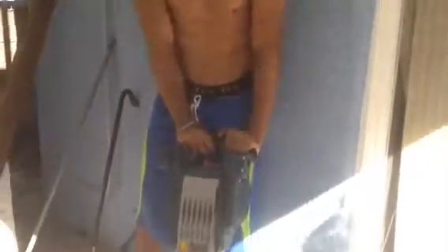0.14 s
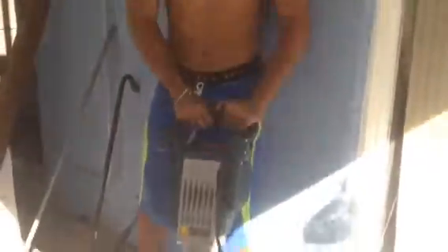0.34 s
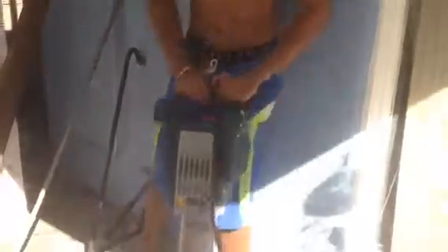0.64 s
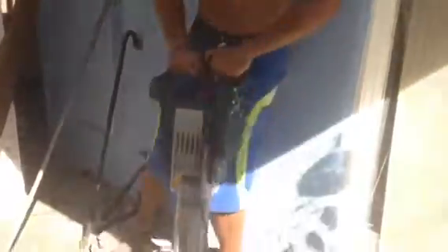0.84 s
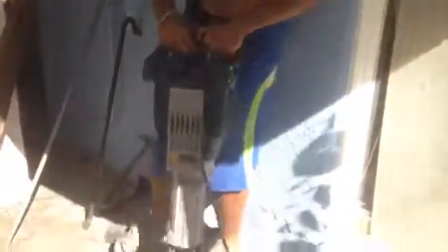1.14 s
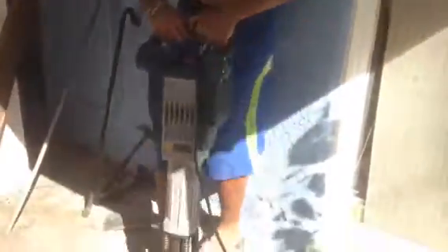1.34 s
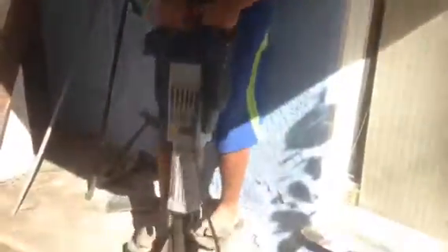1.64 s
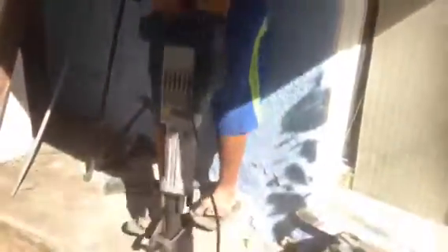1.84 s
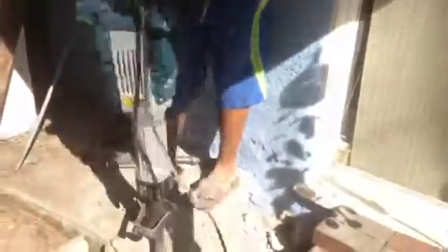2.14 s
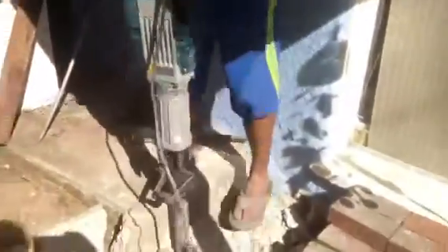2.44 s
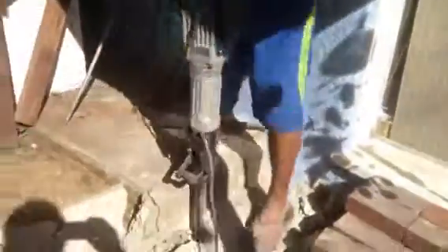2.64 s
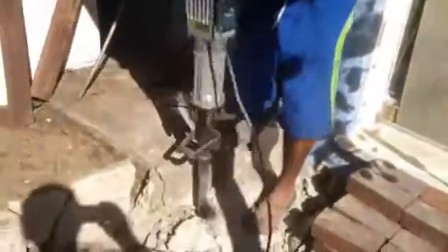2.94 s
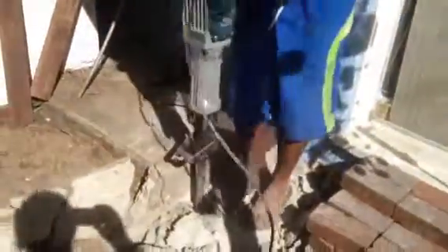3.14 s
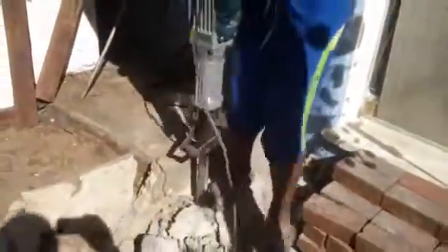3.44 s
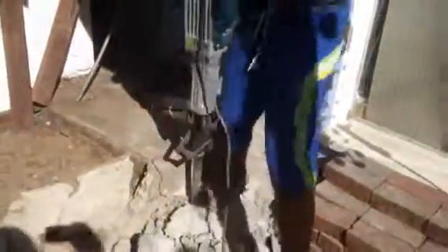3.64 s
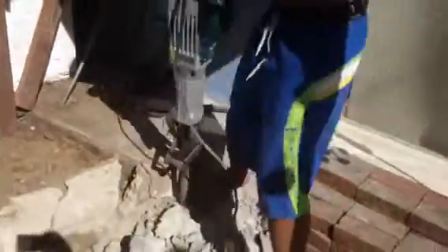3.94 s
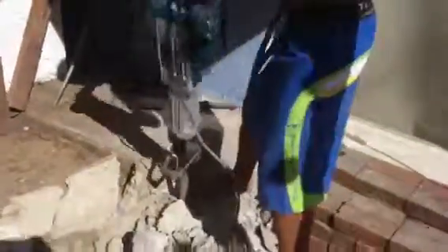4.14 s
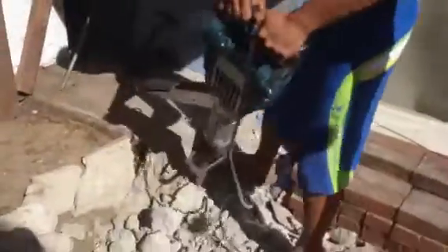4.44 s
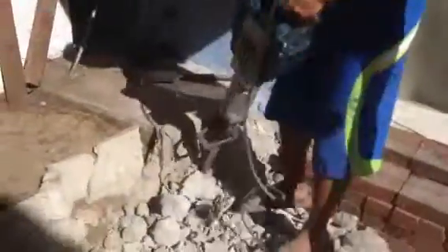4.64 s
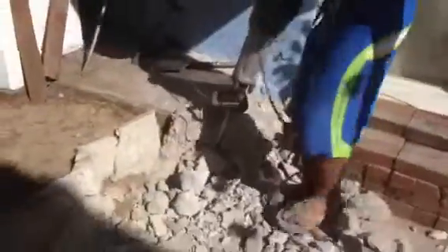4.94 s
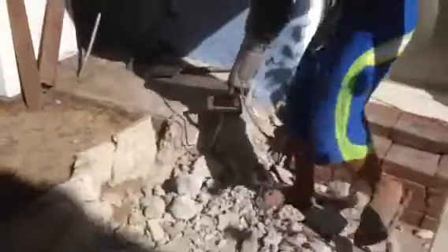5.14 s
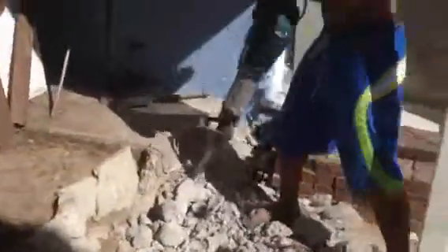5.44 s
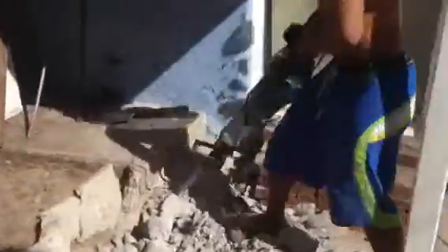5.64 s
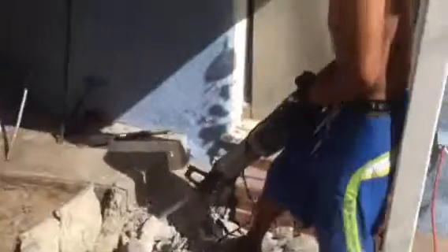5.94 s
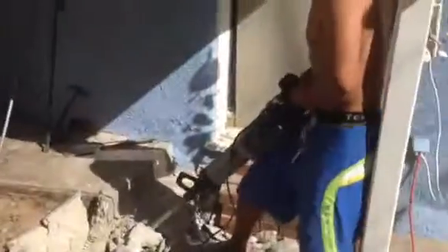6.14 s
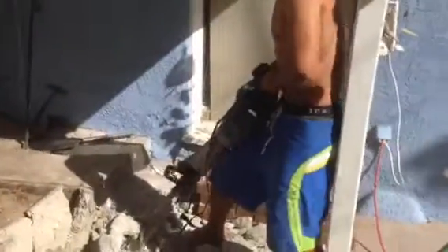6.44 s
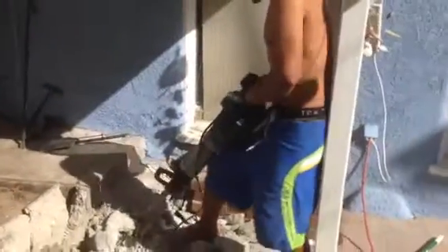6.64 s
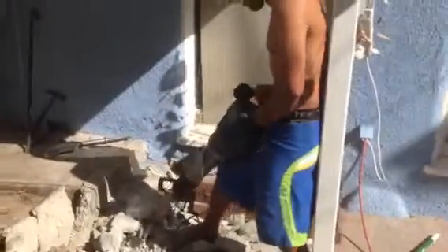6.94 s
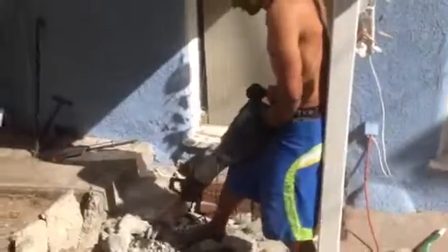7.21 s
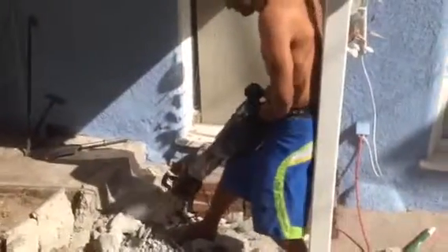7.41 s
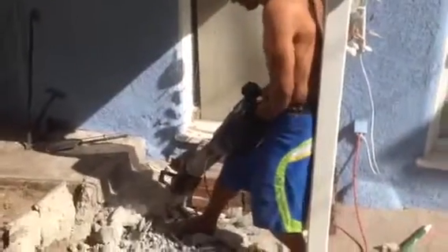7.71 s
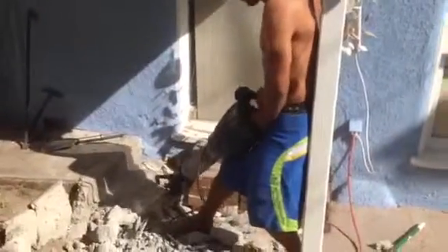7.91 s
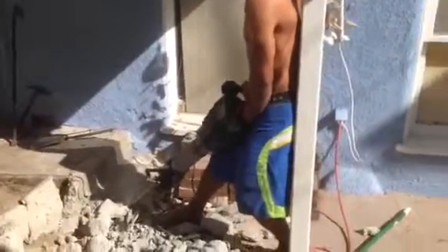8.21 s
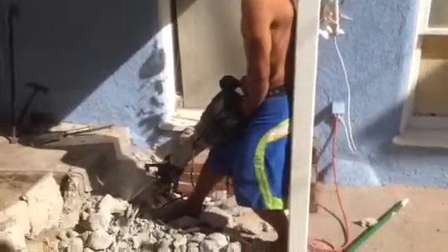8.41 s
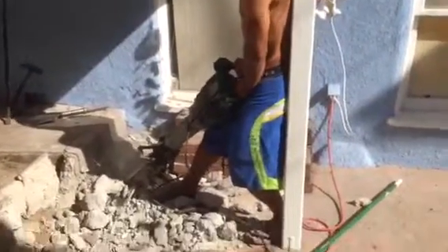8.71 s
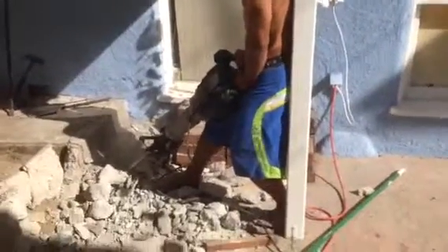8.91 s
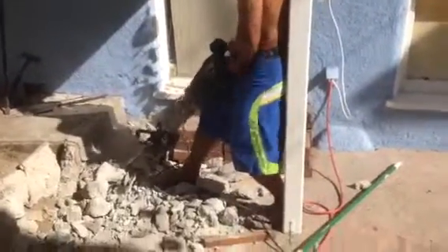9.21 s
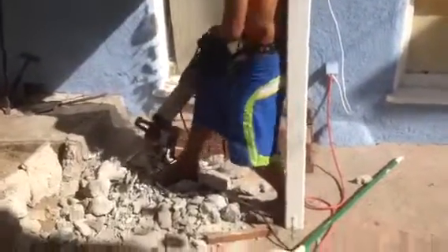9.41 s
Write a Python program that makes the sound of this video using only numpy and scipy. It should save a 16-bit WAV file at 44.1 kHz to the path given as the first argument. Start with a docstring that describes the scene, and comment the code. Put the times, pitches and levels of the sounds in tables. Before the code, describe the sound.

Outdoors beside a house, an electric jackhammer is already working. From 0 to about 1 second it strikes in quick bursts, roughly 25 blows a second: hard gritty cracks, low slab thuds, rubble rattle. It then lifts, the motor racing up into a rushing, fluttering high whine, with two or three isolated knocks near 1.8 to 1.9 seconds. Short bursts return from 2.2 to 3.6 seconds with small gaps; around 2.5 there is a tiny downward squeal and a hollow knock of loosened concrete. From 3.6 to 6.7 the motor runs free, its whine swelling and receding over faint metallic clinking. At 6.7 a deep knock and renewed bursts begin, and from 7.6 to nearly 9.6 hammering is continuous, brighter, with ringing steel and longer rattle, the motor whine dragged lower. A short dull echo and faint low rumble surround everything.

```python
"""A fast run of hard cracks: an electric jackhammer breaks a concrete slab beside a house wall.
Each blow is a short noise crack, a thud of low slab tones and a ring of the steel chisel's tones.
Loose parts and rubble rattle on behind it as fading noise.
Between bursts the tool is lifted: the motor races up, its fan rushing (noise) and whining (tones).
The wall and ground answer with a short dull echo, over a faint low outdoor rumble."""
import sys
import numpy as np
from scipy import signal
from scipy.fft import rfft, irfft, next_fast_len
from scipy.io import wavfile
from scipy.ndimage import uniform_filter1d, map_coordinates

SR = 44100
rng = np.random.default_rng(int(sys.argv[2]) if len(sys.argv) > 2 else 0)


def generate_wav(sig):
    """Save sig (samples, or channels by samples) to the path in sys.argv[1] as 16-bit PCM at SR."""
    pcm = np.round(np.clip(np.atleast_2d(sig).T, -1, 1) * 32767).astype(np.int16)
    wavfile.write(sys.argv[1], SR, pcm)


N = 422037  # length in samples

# Bursts of hammering, before the small scatter from blow to blow: first_blow_s, last_blow_s,
# blow_count, first_gap_s, first_crack_db, later_crack_db, first_ring_db, last_ring_db,
# drag_hz (whine pitch lost per blow)
HAMMER_BURSTS = [(.018, 0.394, 9, .0462, -12.5, -10.5, -27.5, -35.5, 185),
                 (.491, 0.628, 4, .039, -12.5, -13, -32, -37, 125),
                 (.755, .839, 3, 0.038, -11, -12, -37, -39, 126),
                 (2.242, 2.316, 3, .036, -14, -11, -37, -44, 96),
                 (2.415, 2.585, 6, 0.034, -14, -15, -24, -25, 96),
                 (2.868, 3.014, 5, .0397, -17, -11.5, -55, -21, 96),
                 (3.364, 3.507, 5, 0.038, -17.5, -12.5, -30, -37, 106),
                 (6.817, 6.975, 6, .0343, -17, -14, -28, -21, 150),
                 (7.121, 7.305, 6, .0397, -20.5, -13.5, -33, -22.5, 190),
                 (7.424, 7.462, 2, .037, -13, -14.5, -21, -22, 190),
                 (7.628, 9.558, 42, 0.038, -11.5, -14.3, -23, -23, 188)]
# Single blows, listed one by one, some loud and some faint, before scatter: start_s, crack_db, ring_db
SINGLE_BLOWS = [(.928, -12, -43), (.969, -14.5, -38), (1.81, -13, -40), (1.847, -12, -42),
                (1.943, -23, -50), (2.768, -10.5, -25), (3.265, -15, -38), (3.574, -11, -24),
                (6.723, -16.5, -24.5), (7.389, -18.5, -43), (7.549, -17.5, -27)]
# How hard the tool bears on the slab, which sets thud and rattle: time_s, level_db
BEARING_DOWN = [(.9, -7), (1.85, -20), (2.55, -2), (3.4, -3.5), (7.6, -7), (8.4, -2.5), (9.5, -7)]
# Colour of the noise of crushed concrete: pitch_hz, level_db (per Hz, only the shape counts)
STONE_COLOUR = [(100, -23), (350, 1.5), (900, -3), (2300, 0.5), (3800, 0), (5600, 2), (8300, -6.5),
                (11000, -2), (15500, -6)]
# Tones of the steel chisel, before small random changes: pitch_hz, level_db, t60_s (time to fall 60 dB)
CHISEL_TONES = [(3165, -13, 0.2), (4850, -4, 0.26), (4998, -4, 0.2), (5518, 3, 0.22), (7010, -9, 0.28),
                (7130, -6, 0.24), (9370, -7, 0.21), (9550, -10.5, 0.21), (10798, 0, 0.25),
                (11920, -12.5, 0.35), (14520, -9.5, .17), (14665, -8.5, 0.17)]
# How the chisel is seated: time_s, trade_db (the tone near 5.5 kHz gains this, lower ones lose half of it),
# freedom_db (extra ring level)
CHISEL_SEAT = [(.6, -6, 0), (2.5, -3, 0), (3.4, 1, 0.5), (6.9, 2.5, 0), (7.7, -4, 0.5), (7.93, -9, 1),
               (8.35, -2, -2), (8.85, 2, -7), (8.99, 5, 2), (9.24, 4, 2), (9.38, 0, -2), (9.55, 5.5, -0.5)]
# Tones of slab and tool housing, before small random changes: pitch_hz, t60_s, upright_db, slanted_db
SLAB_TONES = [(92, 0.06, -12, -14), (131, 0.078, -2, -2.5), (189.3, 0.09, -8, 2), (238, 0.046, -3, 1.5),
              (370, 0.012, 4, -2), (543, 0.054, -12, -3.5), (765, 0.029, -6, -1), (1080, .02, -6, -12)]
# Slab pieces breaking loose: start_s, pitch_hz, level_db, t60_s
LOOSE_PIECES = [(2.549, 551, -19, 0.12), (6.705, 80, -15, 0.29), (6.73, 136, -16, 0.21)]
# Level of the hammering's top treble: time_s, level_db
TREBLE_LEVEL = [(1, -.5), (2.1, -3), (3.6, -5), (6.9, -1.5), (7.7, 2), (8.8, 0)]
# Colour of the fan air and gear noise: pitch_hz, level_db (per Hz, only the shape counts)
AIR_COLOUR = [(130, -55), (210, -24.5), (400, -10.5), (930, -6), (2120, 0), (2880, -2), (4620, -3.5),
              (6900, -9), (9540, -11.5), (15300, -21)]
# Resonances of the motor casing: pitch_hz, width_hz, boost_db
CASING_PEAKS = [(944, 240, 3), (1730, 57, 2), (2080, 90, 4.5)]
# Fan whine: multiple (of the blade pitch), level_db (at full speed, relative to the motor noise)
FAN_TONES = [(1, -16.8), (2, -16.5), (3, -21)]
# Crank shake: multiple (of the crank's turning rate), level_db (at full speed, relative to the motor noise)
CRANK_TONES = [(2, -25.5), (3, -26.5), (4, -27)]
# Fan whine as the vents turn to and from the listener: time_s, level_db
VENT_TURNS = [(1.5, 9), (2.2, 4), (4.1, 12), (4.6, 1), (4.9, 10), (5.3, 1), (5.6, 11), (5.85, 4.5),
              (6.35, 3), (6.6, 10.5)]
# How much motor noise reaches the listener as the tool is moved about: time_s, level_db
MOTOR_NEARNESS = [(.3, 0), (1.05, -2), (1.4, 1.5), (1.75, 2.3), (2, -1.5), (4.5, -.6), (5.9, 1), (6.7, 0),
                  (7.2, -1), (8.2, 3.5)]
# The crank's highest tone, which swells as the idling tool is leant on the slab: time_s, level_db
TOOL_LEAN = [(4.5, -5), (5.1, 1), (6.05, -1), (6.4, 6.5), (7, 3)]

SINGLE_DRAG_HZ = 60  # whine pitch lost to a single blow
SETTLE = .65  # share of the change of pace still to come after each blow
SCATTER_S, CRACK_SCATTER_DB, RING_SCATTER_DB = .0003, .9, 1.5  # typical scatter from blow to blow
BLADES, WHINE_PER_CRANK_TURN = 13, 134.4  # whine cycles per rotor turn and per crank turn
FREE_HZ, SPIN_UP_S = 4656, .47  # whine pitch with no load, time constant of its recovery
START_SAG_HZ = 1820  # the motor is already under load
FAN_DB, FAN_DB_PER_HZ = -18.4, .021  # fan rush at full speed, its loss per Hz of sag
GEAR_DB = -33.3  # gear noise, the same at any speed
TREBLE_HZ, TOP_HZ = 11000, 15350  # where the top treble begins, where all sound ends


def piston():
    """The piston strikes in bursts and single blows: rows of time_s, crack_db, ring_db, drag_hz."""
    rows = [(*blow, SINGLE_DRAG_HZ) for blow in SINGLE_BLOWS]
    for burst in HAMMER_BURSTS:
        first, last, count, first_gap, entry_db, crack_db, first_ring_db, last_ring_db, drag_hz = burst
        times = burst_times(first, last, round(count), first_gap)
        ring_levels = np.linspace(first_ring_db, last_ring_db, len(times))
        for k, ring_db in enumerate(ring_levels):
            rows.append((times[k], crack_db if k else entry_db, ring_db, drag_hz))
    spread = [SCATTER_S, CRACK_SCATTER_DB, RING_SCATTER_DB, 0]
    return np.array(sorted(rows)) + rng.standard_normal((len(rows), 4)) * spread


def burst_times(first, last, count, first_gap):
    """The gap eases from the first one to a steady gap that makes the last blow fall on its listed time."""
    k = np.arange(count)
    early = (1 - SETTLE ** k) / (1 - SETTLE)
    steady_gap = first_gap
    if count > 2:
        steady_gap = (last - first - first_gap * early[-1]) / (k - early)[-1]
    return first + first_gap * early + steady_gap * (k - early)


def slanted(s):
    """The tool starts upright and is later driven in at a slant."""
    return s > 5


def concrete(blows):
    """The tip crushes stone in a short crack; chips and the loose chisel chatter on behind it."""
    t = np.arange(SR // 5) / SR
    crack, rattle = np.zeros(N), np.zeros(N)
    stretches = np.exp(0.14 * rng.standard_normal((len(blows), 2)))  # no two blows last equally long
    for (s, db, _, _), (crack_stretch, rattle_stretch) in zip(blows, stretches):
        skid_t60 = .15 if slanted(s) else .11  # a slanted chisel skids on
        add(crack, s, amp(db + 4.0) * fade(t, t60=0.033 * crack_stretch, attack=0.00055))
        add(rattle, s, amp(db + 2.5) * fade(t, t60=skid_t60 * rattle_stretch, attack=0.0046))
    bite_db, = curves(BEARING_DOWN)
    rattle *= amp(bite_db + 0.69 * wobble(220))
    stone = mottled(colour(grit(spread_db=2.0), STONE_COLOUR), depth_db=3.5, width=5, length=5)
    chips = mottled(colour(grit(spread_db=2.5), STONE_COLOUR), depth_db=2.0, width=2, length=5)
    return crack * stone + rattle * chips


def chisel(blows):
    """Every blow chokes the steel's last ring and starts a new one; rubbing in the hole roughens each tone."""
    t = np.arange(SR // 5) / SR
    hz, mode_db, t60 = np.transpose(CHISEL_TONES)[:, :, None]
    favour = np.select([hz < 5250, hz < 6000], [-.5, 1])
    gaps = np.diff(blows[:, 0], append=N / SR)
    seat_s, trade_db, free_db = np.transpose(CHISEL_SEAT)
    rub = wobble(130)
    out = np.zeros(N)
    for (s, _, db, _), gap in zip(blows, gaps):
        strength, detune, phase = rng.standard_normal((3, len(CHISEL_TONES), 1))
        # each tone takes its own random stretches of the rubbing, for loudness and for phase
        starts = rng.integers(N - len(t), size=(2, len(CHISEL_TONES), 1))
        waver, slip = rub[starts + np.arange(len(t))]
        share = amp(mode_db + favour * np.interp(s, seat_s, trade_db) + 3.7 * strength)
        angle = 2 * np.pi * (hz * (1 + .0008 * detune) * t + phase) + .55 * slip
        tones = np.sin(angle) * amp(3.5 * waver)
        ring = np.sum(share * tones * fade(t, t60, attack=0.0045), axis=0) / np.linalg.norm(share)
        choke = np.exp(-np.maximum(t - gap, 0) / 0.0086)  # from the next blow on
        add(out, s, amp(db + 11 + np.interp(s, seat_s, free_db)) * choke * ring)
    return out


def slab(blows):
    """The blow and two rebounds of the tool thump the slab; its voice changes as the tool is slanted."""
    t = np.arange(SR // 5) / SR
    hz, t60, upright_db, slanted_db = np.transpose(SLAB_TONES)[:, :, None]
    out = np.zeros(N)
    for s, db, _, _ in blows:
        slant = slanted(s)
        tone_db = slanted_db if slant else upright_db
        # delay in s (before scatter), level in dB, signed strength
        contacts = [(0, -6, -0.65), (.0089, -3.5, 0.85), (.0165, -9 if slant else -16, 1)]
        for delay, contact_db, sign in contacts:
            strength, detune = rng.standard_normal((2, len(SLAB_TONES), 1))
            share = amp(tone_db + 2 * strength)
            tones = np.sin(2 * np.pi * hz * (1 + 0.019 * detune) * t)
            thump = np.sum(share * tones * fade(t, t60, attack=0.00037), axis=0)
            late = delay * (1 + 0.063 * rng.standard_normal())
            add(out, s + late, sign * amp(db + contact_db) * thump)
    return out * amp(curves(BEARING_DOWN)[0])


def breaks():
    """Loosened pieces of slab give hollow knocks: single fading tones, slightly roughened."""
    t = np.arange(SR // 2) / SR
    out = np.zeros(N)
    for s, hz, db, t60 in LOOSE_PIECES:
        add(out, s, amp(db) * np.sin(2 * np.pi * hz * t) * fade(t, t60, attack=0.0035))
    return out * amp(2.4 * wobble(150))


def squeal(s, from_hz, to_hz, length, db):
    """The chisel slips down a crack with a short squeal that slides in pitch."""
    u = np.linspace(0, 1, round(length * SR))
    phase = 2 * np.pi * np.cumsum(from_hz + (to_hz - from_hz) * u) / SR
    out = np.zeros(N)
    add(out, s, amp(db) * u * np.sin(np.pi * u) * np.sin(phase))
    return out


def brighten(x):
    """Raise or lower the top treble of x over time."""
    top = filtered(x, lambda hz: 1 - 1 / (1 + (hz / TREBLE_HZ) ** 10))
    return x + (amp(curves(TREBLE_LEVEL)[0]) - 1) * top


def sag(blows):
    """Hz the whine lies under its free pitch: each blow brakes the motor, which then races up again."""
    t = np.arange(N) / SR
    braking = np.zeros(N)
    braking[0] = START_SAG_HZ
    for s, _, _, drag_hz in blows:
        add(braking, s, np.array([drag_hz]))
    recovering = signal.fftconvolve(braking, np.exp(-t / SPIN_UP_S))[:N]
    return uniform_filter1d(recovering, size=1500)


def casing(f):
    """The motor casing resonates: its gain at each frequency f."""
    return amp(sum(db / (1 + (2 * (f - hz) / width) ** 2) for hz, width, db in CASING_PEAKS))


def motor(blows):
    """Fan air and gear noise through the casing, with blade, rotor and crank tones locked together."""
    sag_hz = sag(blows)
    whine_hz = FREE_HZ - sag_hz
    power = (whine_hz / FREE_HZ) ** 2  # a slowed motor sings less
    rush = amp(FAN_DB - FAN_DB_PER_HZ * sag_hz)
    level = np.hypot(rush, amp(GEAR_DB)) * amp(curves(MOTOR_NEARNESS)[0])
    blade = 2 * np.pi * np.cumsum(whine_hz * (1 + .001 * wobble(60))) / SR  # running phase
    crank = blade / WHINE_PER_CRANK_TURN

    air = unit(filtered(colour(grit(spread_db=0.6), AIR_COLOUR), casing))
    air = mottled(air, depth_db=2.5, width=2, length=10)
    air *= amp(0.4 * np.sin(crank) + 0.54 * wobble(9))  # the gears load up once a turn

    vents_db, = curves(VENT_TURNS)
    whine = np.zeros(N)
    for k, db in FAN_TONES:
        whine += amp(db + vents_db / k ** 2 + 2.8 * wobble(11)) * np.sin(k * blade)
    whine *= power * amp(1.2 * wobble(70))  # it flutters

    rotor = amp(-32.5 + 2.4 * wobble(7.1)) * np.sin(blade / BLADES)

    lean_db, = curves(TOOL_LEAN)
    highest = CRANK_TONES[-1][0]
    shake = np.zeros(N)
    for k, db in CRANK_TONES:
        shake += amp(db + lean_db * (k == highest) + 2.8 * wobble(56)) * np.sin(k * crank)
    return level * (air + whine + rotor + shake * power)


def clatter():
    """Loose parts of the tool holder clink unevenly all the time: noise around 2400 Hz."""
    metal = unit(filtered(rng.standard_normal(N), lambda hz: 1 / (1 + ((hz - 2400) / 330) ** 2)))
    return amp(-44.5 + 7.8 * wobble(70)) * metal


def walls(x):
    """The house wall and the ground scatter a short, duller answer."""
    t = np.arange(SR // 2) / SR
    tail = rng.standard_normal(len(t)) * fade(t, t60=0.17, attack=.01)
    echo = signal.fftconvolve(x, tail / np.linalg.norm(tail))[:N]
    return filtered(echo, lambda hz: 1 / np.hypot(1, hz / 6000))


def yard():
    """A faint low outdoor rumble, made of steady noise."""
    rumble = [(20, -29), (65, -6), (200, -18.0), (12000, -35.5)]  # pitch_hz, level_db
    return amp(-44.5) * colour(rng.standard_normal(N), rumble)


def amp(db):
    """Decibels to gain."""
    return 10 ** (np.asarray(db) / 20)


def unit(x):
    """Scale to an average strength (rms) of 1."""
    return x / np.sqrt(np.mean(x ** 2))


def curves(rows):
    """One value per sample for each column after the time, joined by straight lines."""
    s, *cols = np.transpose(rows)
    return [np.interp(np.arange(N) / SR, s, c) for c in cols]


def wobble(rate):
    """A smooth random curve shaped by rate random points a second."""
    return map_coordinates(rng.standard_normal(int(N * rate / SR) + 2), [np.arange(N) * rate / SR])


def fade(t, t60, attack):
    """Loudness shape that rises from t = 0 and dies away by 60 dB every t60 seconds."""
    return amp(-60 * t / t60) * (1 - np.exp(-t / attack))


def add(track, s, sound):
    """Mix a sound into the track at time s."""
    part = track[max(0, round(s * SR)):][:len(sound)]
    part += sound[:len(part)]


def filtered(x, response):
    """Multiply each frequency of x by the gain that response gives for it."""
    m = next_fast_len(N + SR // 2)  # spare room so the end does not wrap onto the start
    return irfft(rfft(x, m) * response(np.fft.rfftfreq(m, 1 / SR)), m)[:N]


def colour(x, points):
    """Shape the spectrum of x by (pitch_hz, level_db) points, at rms 1."""
    f, db = np.transpose(points)
    return unit(filtered(x, lambda hz: amp(np.interp(np.log(hz + 1), np.log(f), db))))


def grit(spread_db):
    """White noise that comes in sub-millisecond grains."""
    return rng.standard_normal(N) * amp(spread_db * wobble(1400))


def mottled(x, depth_db, width, length):
    """Give x resonances that come and go, width frequency bins broad and length time frames long."""
    z = signal.stft(x, nperseg=512)[2]
    field = uniform_filter1d(rng.standard_normal(z.shape), width, axis=0)
    field = uniform_filter1d(field, length, axis=1)
    return unit(signal.istft(z * amp(depth_db * unit(field)), nperseg=512)[1][:N])


def scene():
    """Hammer, its echo, motor, clatter and yard at one microphone, the same in both channels."""
    blows = piston()
    hammer = brighten(concrete(blows) + chisel(blows)) + slab(blows) + breaks()
    slip = squeal(s=2.517, from_hz=680, to_hz=464, length=0.045, db=-13.5)
    hammer += slip * amp(2.5 * wobble(300))
    mono = hammer + amp(-9.5) * walls(hammer) + motor(blows) + clatter() + yard()
    return np.array([mono, mono])


def record(dry):
    """Thin out the deepest bass, round off the highest peaks and keep nothing above the band limit."""
    thinned = signal.sosfilt(signal.butter(2, 55, "highpass", fs=SR, output="sos"), dry)
    rounded = thinned / (1 + np.abs(thinned / .75) ** 4) ** (1 / 4)
    return np.array([filtered(x, lambda hz: hz < TOP_HZ) for x in rounded])


dry = scene()
out = record(dry)
generate_wav(out)
```